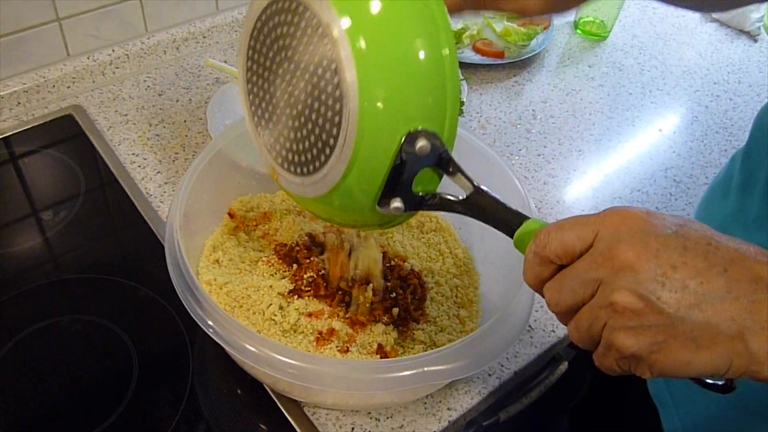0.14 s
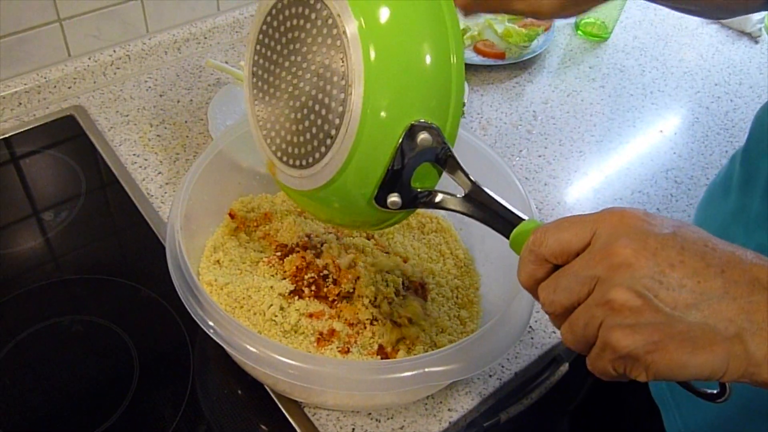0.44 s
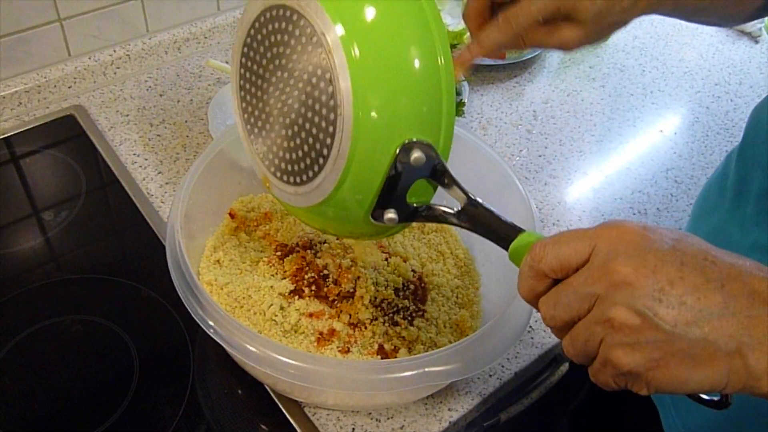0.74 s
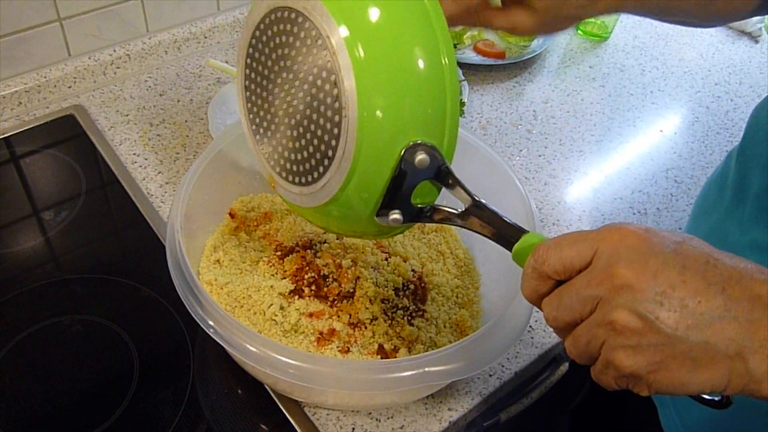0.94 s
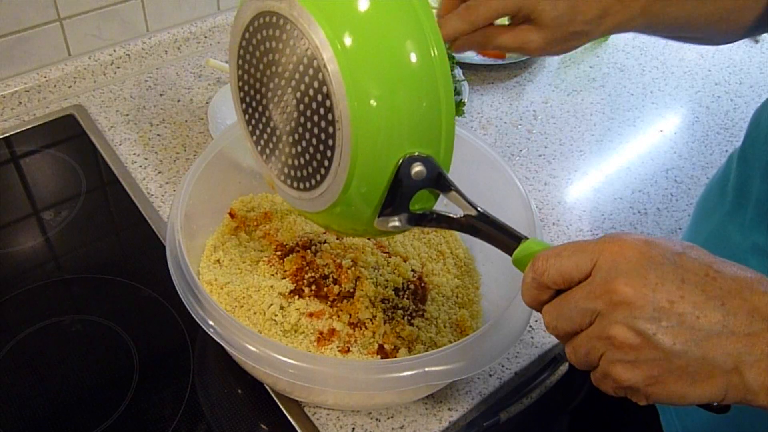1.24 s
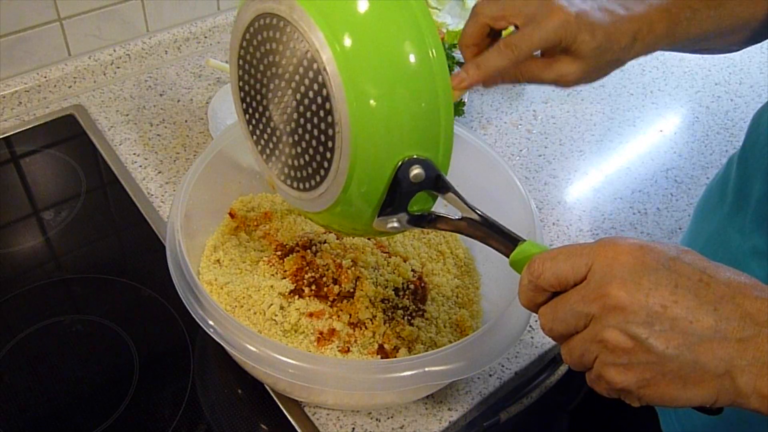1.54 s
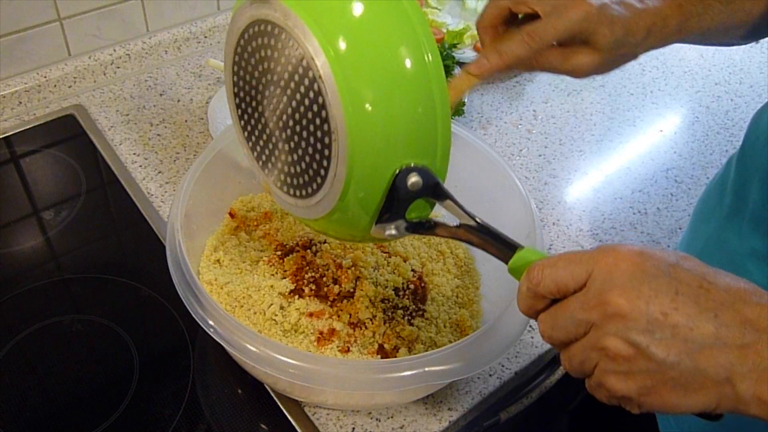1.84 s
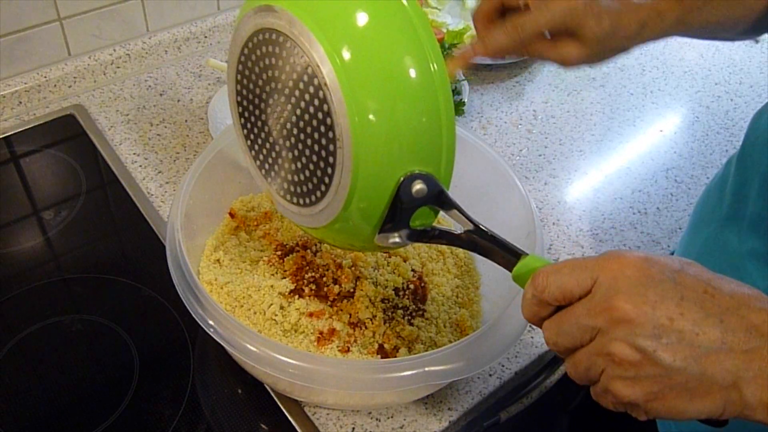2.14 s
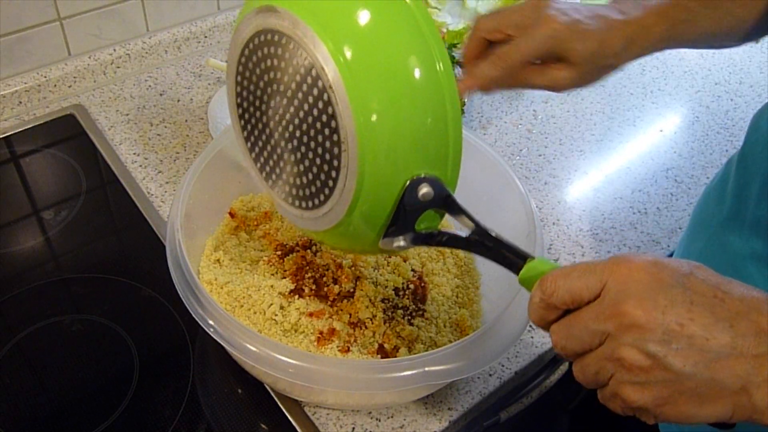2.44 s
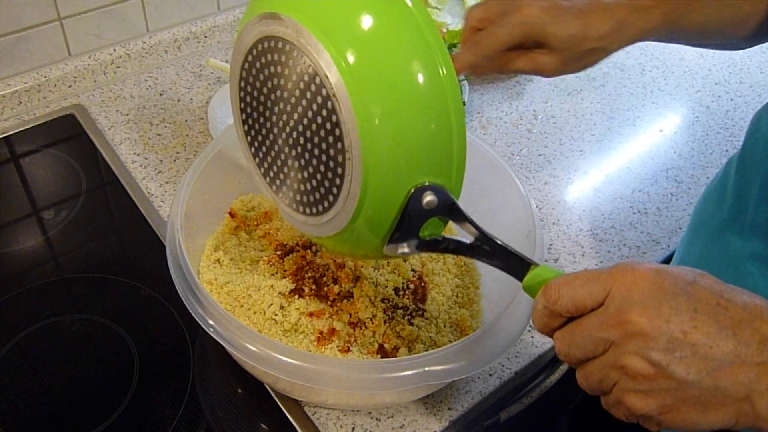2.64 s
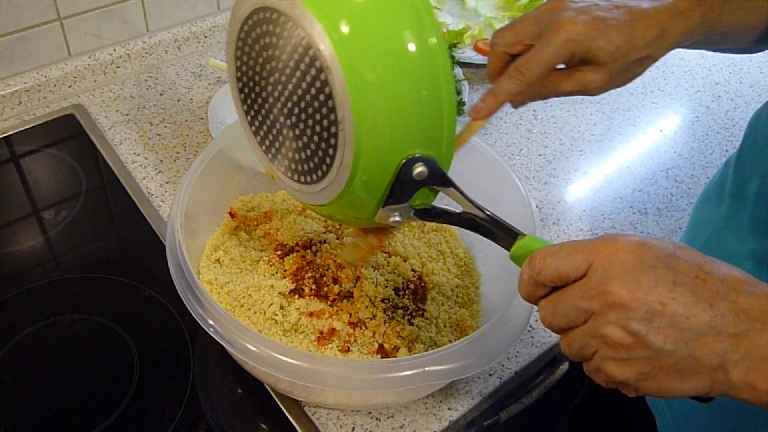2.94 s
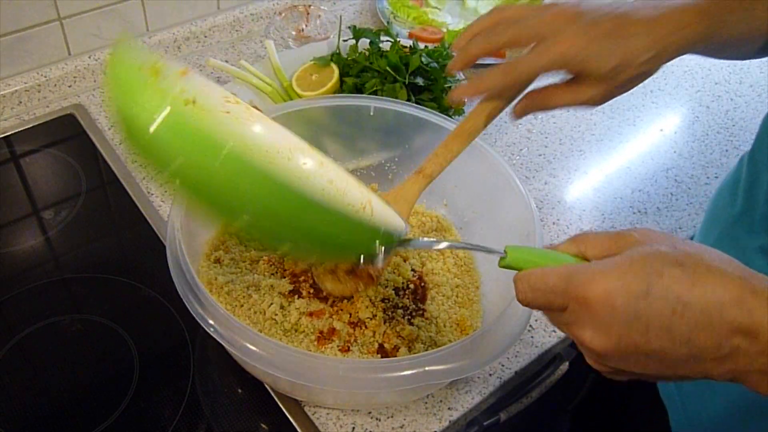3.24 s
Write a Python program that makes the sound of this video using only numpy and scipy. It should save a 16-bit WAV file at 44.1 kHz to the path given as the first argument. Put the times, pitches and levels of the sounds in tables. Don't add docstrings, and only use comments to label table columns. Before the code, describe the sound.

Wooden spoon on a coated frying pan, close and dull-ringing: light bowl bumps, spaced woody knocks with faint gritty drags, then a much louder pan clunk. Short kitchen echo, steady hum and hiss from a cheap microphone.

```python
import sys
import numpy as np
from scipy import signal
from scipy.fft import rfft, irfft
from scipy.io import wavfile

SR = 44100
rng = np.random.default_rng(int(sys.argv[2]) if len(sys.argv) > 2 else 0)


def invert_db(level):
    return 10 ** (np.asarray(level, dtype=float) / 20)


def waveform_to_disk(signal):
    frames = np.transpose(np.atleast_2d(signal))
    scaled = np.clip(frames, -1, 1) * 32767
    samples = np.round(scaled).astype(np.int16)
    wavfile.write(sys.argv[1], SR, samples)


N = 149940

# (frequency [Hz], level [dB], t60 [s])
BELLY_MODES = [(799, -2.5, 0.065), (904.4, -2.5, 0.041), (1051, 3.5, 0.04), (1153, -6, 0.057),
               (1316, -3.5, 0.027)]
# (frequency [Hz], level [dB], t60 [s])
WALL_MODES = [(1394, -1.5, 0.051), (1512, -7, 0.073), (1650, 2, 0.076), (1814, -4, 0.078),
              (1910, -6, 0.068), (2200, -19.5, 0.14), (2420, -22, 0.054)]
# (frequency [Hz], level [dB], t60 [s])
RIM_MODES = [(2630, -2, 0.079), (3100, 2, 0.14), (3230, -7, 0.037), (3990, 4, 0.063), (4330, -3.5, 0.098),
             (4920, 10.5, 0.013), (5294, 7, 0.051), (6130, 3, .04), (6490, 4.5, 0.061), (6870, -12, 0.049),
             (7700, -14, .04), (9260, -15.5, 0.11), (10300, -9, .04)]
LANDING_S = 3.2664


def ring(force, modes, spot_hz=None, bend=None):
    spot_db_per_oct = 6
    out = np.zeros(len(force))
    for k, (hz, db, t60_s) in enumerate(modes):
        sign = 1
        if bend is not None:
            hz = hz * bend[k]
            sign = (-1) ** k
        if spot_hz is not None:
            db = db - spot_db_per_oct * abs(np.log2(hz / spot_hz))
        pole = np.exp(2j * np.pi * hz / SR - np.log(1000) / (max(t60_s, 0.003) * SR))
        out += sign * invert_db(db) * signal.lfilter([1], [1, -pole], force).imag
    return out


def add(out, start_s, x):
    i = int(start_s * SR)
    out[i:i + len(x)] += x[:N - i]


def push(contact_ms):
    u = np.arange(SR // 2) / SR / (max(contact_ms, 0.03) / 1000)
    return np.sin(np.pi * np.minimum(u, 1)) ** 2


def peak(x, db):
    return x * invert_db(db) / np.abs(x).max()


def unit(x):
    return x / x.std()


def band(x, lo_hz, hi_hz):
    return signal.sosfilt(signal.butter(3, [lo_hz, hi_hz], "bandpass", fs=SR, output="sos"), x)


def burst(t60_s):
    t = np.arange(SR // 2) / SR
    return rng.standard_normal(len(t)) * invert_db(-60 * t / t60_s)


def room(x):
    echo_db, bass_t60_s, treble_t60_s, split_hz, gap_s = -7.5, 0.47, 0.22, 960, 0.0025
    t = np.arange(SR // 2) / SR

    def noise(kind):
        sos = signal.butter(1, split_hz, kind, fs=SR, output="sos")
        return signal.sosfilt(sos, rng.standard_normal(len(t)))

    tail = noise("low") * invert_db(-60 * t / bass_t60_s) + noise("high") * invert_db(-60 * t / treble_t60_s)
    tail *= np.clip(t / gap_s - 1, 0, 1)
    tail /= np.sqrt(np.sum(tail ** 2))
    return x + invert_db(echo_db) * signal.fftconvolve(x, tail)[:len(x)]


def hiss():
    # (frequency [Hz], density [dB per Hz])
    hiss_curve = [(18, -47), (30, -34), (43, -8), (281, -3), (531, -8.5), (586, -6.5), (696, -10.5),
                  (6510, -23.5), (10600, -41.5), (13800, -75), (22000, -120)]
    # (frequency [Hz], rms level [dB])
    whine_tones = [(7530, -87), (8500, -90)]
    hiss_db = -55.5
    t = np.arange(N) / SR
    curve_hz, curve_db = np.transpose(hiss_curve)
    shape_db = np.interp(np.log(np.fft.rfftfreq(N, 1 / SR) + 1), np.log(curve_hz), curve_db)
    noise = irfft(rfft(rng.standard_normal(N)) * invert_db(shape_db), N)
    whine = sum(np.sqrt(2) * invert_db(db) * np.sin(2 * np.pi * hz * t) for hz, db in whine_tones)
    return unit(noise) * invert_db(hiss_db) + whine


def bowl_bumps():
    # (time [s], level [dB], contact [ms], tick re bump [dB])
    bump_events = [(.0005, -35, 0.82, -13), (.042, -51, 0.81, -1), (.051, -37.5, 0.68, -24),
                   (0.079, -35, 1.4, -23), (0.087, -40, 0.33, -31), (0.1217, -29, 1.6, -29),
                   (0.135, -46, 1.2, -31), (0.146, -42, 1.4, -24), (.1535, -24, 0.56, -22),
                   (.164, -42.5, 1.4, -27), (.18, -44, 0.56, -9), (.198, -54, 0.33, 0),
                   (.2525, -38.5, 0.29, 5), (0.254, -26.5, 2.84, -32), (.389, -41, .9, -11)]
    # (frequency [Hz], level [dB], t60 [s])
    bowl_modes = [(152, 0, 0.091), (251, 3, 0.059), (387, -3.5, 0.03), (538, 10.5, 0.017),
                  (778, 2.5, 0.023), (984, -3, 0.027), (1530, 0, 0.03)]
    tick_hz, tick_t60_s = 3820, 0.0071
    out = np.zeros(N)
    for start_s, db, contact_ms, tick_db in bump_events:
        body = peak(ring(push(contact_ms), bowl_modes), db)
        tick = peak(band(burst(tick_t60_s), tick_hz / 1.44, tick_hz * 1.27), db + tick_db)
        add(out, start_s, body + tick)
    return out


def knocks():
    # (time [s], base [dB], belly [dB], wall [dB], rim [dB])
    knock_events = [
        (0.2529, -54, -38, -40, -63),
        (0.5052, -34.5, -36.5, -57, -44),
        (0.5231, -35, -29.5, -26, -36),
        (0.5349, -34.5, -42, -47, -40.5),
        (.9060, -30.5, -27.5, -26.5, -35),
        (1.2747, -34, -31.5, -44, -64),
        (1.9214, -28.5, -23, -20, -27.5),
        (2.0720, -48, -49, -58, -49.5),
        (2.2990, -31.5, -30, -27.5, -42),
        (2.7836, -58, -36, -41, -38),
    ]
    # (base [Hz], wall [Hz], rim [Hz])
    knock_spots = [(300, 1300, 3300), (480, 1600, 2900), (480, 2800, 3460), (450, 930, 5500),
                   (480, 1180, 3000), (430, 1200, 4200), (484, 1200, 4500), (600, 1650, 5300),
                   (560, 1000, 3200), (600, 1650, 4800)]
    # (frequency [Hz], level [dB], t60 [s])
    base_modes = [(289, -20, .08), (393, -8, 0.45), (473.2, 7, 0.063), (557, 1, 0.27), (590.5, 1.5, 0.11),
                  (674, -2.5, 0.094)]
    clack_db, snap_db, clack_t60_s = -3.5, -3.5, 0.018
    mute_after_s, mute_fall_s, mute_db = 0.016, 0.0022, -16
    detune, swell_s = 0.016, 0.0013
    t = np.arange(SR // 2) / SR
    mute = invert_db(mute_db * np.clip((t - mute_after_s) / mute_fall_s, 0, 1))
    swell = 1 - 0.23 * np.exp(-t / swell_s)
    out = np.zeros(N)
    for event, (base_hz, wall_hz, rim_hz) in zip(knock_events, knock_spots):
        start_s, base_db, belly_db, wall_db, rim_db = event
        clack = burst(clack_t60_s)
        bend = 1 + detune * rng.standard_normal(14)
        base = peak(ring(push(0.99), base_modes, base_hz, bend) * swell, base_db)
        belly = peak(ring(push(0.65), BELLY_MODES, None, bend), belly_db)
        belly += peak(band(clack, 534, 1280), belly_db + clack_db)
        wall = peak(ring(push(0.34), WALL_MODES, wall_hz, bend ** 0.38), wall_db)
        wall += peak(band(clack, 1430, 3360), wall_db + clack_db)
        rim = peak(ring(push(0.058), RIM_MODES, rim_hz, bend ** 0.23), rim_db)
        rim += peak(band(clack, rim_hz / 1.35, rim_hz * 1.37), rim_db + snap_db)
        add(out, start_s, room(-mute * (base + belly + wall + rim)))
    return out


def drags():
    # (time [s], length [s], level [dB], treble re level [dB])
    drag_strokes = [
        (0.527, 0.21, -65, -7),
        (.95, .08, -62, -9),
        (1.019, .12, -63, 1),
        (1.293, .16, -65, -10),
        (1.668, 0.11, -63, -3),
        (1.977, 0.13, -73.5, 2),
        (2.347, 0.075, -65, -3.5),
        (2.394, 0.15, -62, -1),
        (2.75, 0.21, -71.5, 6.5),
    ]
    grit_per_s, grit_db, grit_spread_db, rub_db = 1800, -1, 2, -2
    t = np.arange(N) / SR
    dull, bright = np.zeros(N), np.zeros(N)
    for start_s, length_s, db, bright_db in drag_strokes:
        stroke = np.sin(np.pi * np.clip((t - start_s) / length_s, 0, 1))
        dull += invert_db(db) * stroke
        bright += invert_db(db + bright_db) * stroke
    grains = (rng.random(N) < grit_per_s / SR) * rng.standard_normal(N)
    grains *= invert_db(grit_spread_db * rng.exponential(size=N))
    grit = invert_db(grit_db) * unit(grains) + rng.standard_normal(N)
    low = unit(ring(grit, BELLY_MODES)) * invert_db(1.5) + unit(ring(grit, WALL_MODES))
    high = unit(ring(grit, RIM_MODES[:-1])) + invert_db(rub_db) * unit(band(grit, 1500, 5800))
    return dull * low + bright * high


def landing():
    # (frequency [Hz], level [dB], t60 [s])
    landing_modes = [(145, -31, .1), (240, -26.5, .06), (340, -1, 0.094), (417, -13.5, .1),
                     (473, 4.5, 0.077), (496, 8, 0.077), (560, 15.5, 0.023), (612, 0, 0.11),
                     (747, 6.5, 0.0266), (938, 12.5, 0.02), (1237, 8.5, 0.032), (1684, -6, 0.061),
                     (2270, -11, 0.039), (3100, -28, .02)]
    out = np.zeros(N)
    thud = peak(ring(push(0.53), landing_modes), -3.5)
    rattle = peak(band(burst(0.025), 2400, 5600), -33)
    scuff = peak(band(burst(0.051), 770, 2670), -24.5)
    add(out, LANDING_S, thud + rattle)
    add(out, LANDING_S + 0.002, scuff)
    return out


def air_puff():
    puff_db, puff_hz, puff_t60_s, rise_s = -28.5, 4.5, 0.34, 0.009
    t = np.maximum(np.arange(N) / SR - LANDING_S, 0)
    swing = invert_db(puff_db - 60 * t / puff_t60_s) * np.cos(2 * np.pi * puff_hz * t)
    return swing * np.minimum(t / rise_s, 1)


def scene():
    bass_cut_hz = 154
    near = knocks() + room(drags()) + room(bowl_bumps() + landing())
    near = signal.sosfilt(signal.butter(2, bass_cut_hz, "high", fs=SR, output="sos"), near)
    return (near + air_puff() + hiss())[None]


def top_cut(x):
    return signal.sosfilt(signal.butter(12, 10790, fs=SR, output="sos"), x)


def record(dry):
    top_hz, offset = 9900, 0.0207
    mix = signal.sosfilt(signal.butter(6, top_hz, fs=SR, output="sos"), dry) + offset
    return top_cut(mix)


dry = scene()
out = record(dry)
waveform_to_disk(out)
```